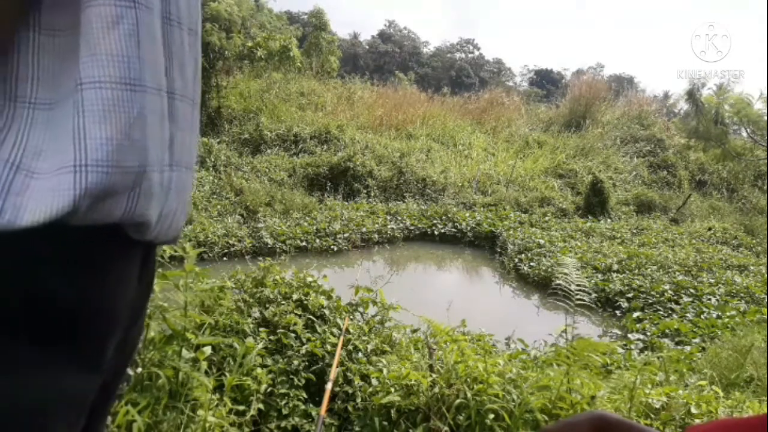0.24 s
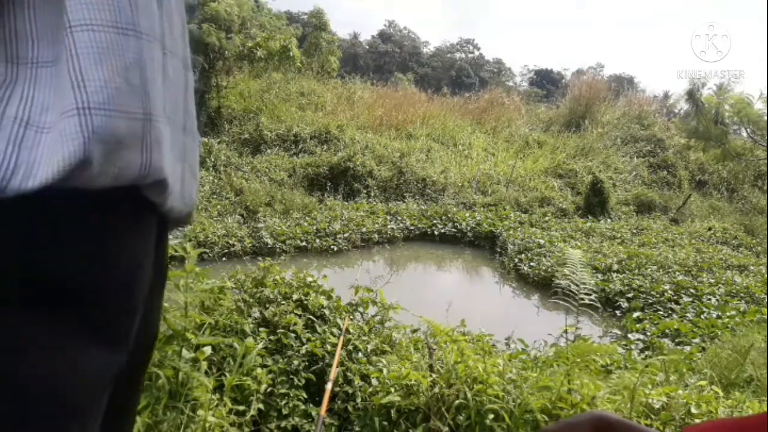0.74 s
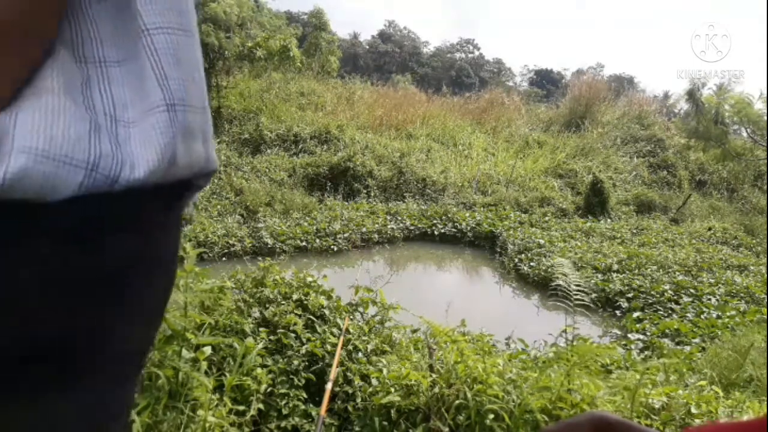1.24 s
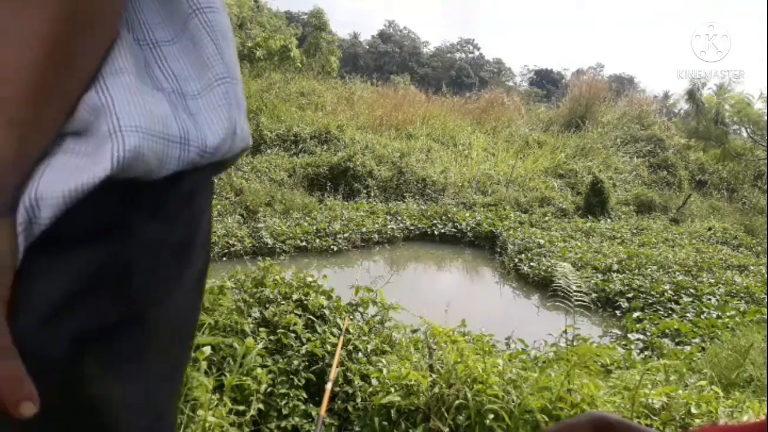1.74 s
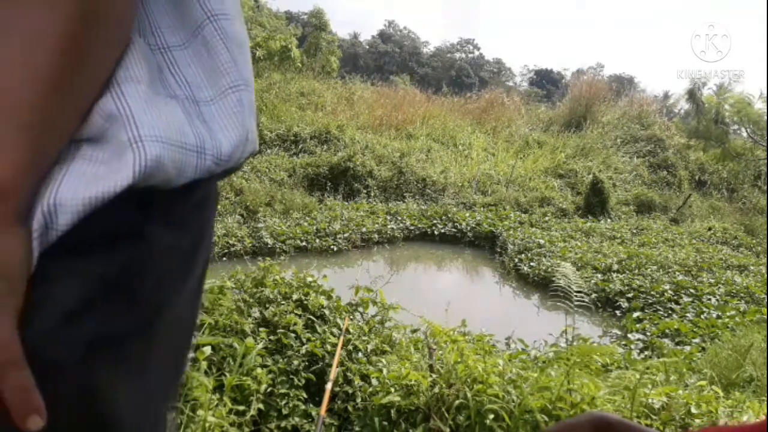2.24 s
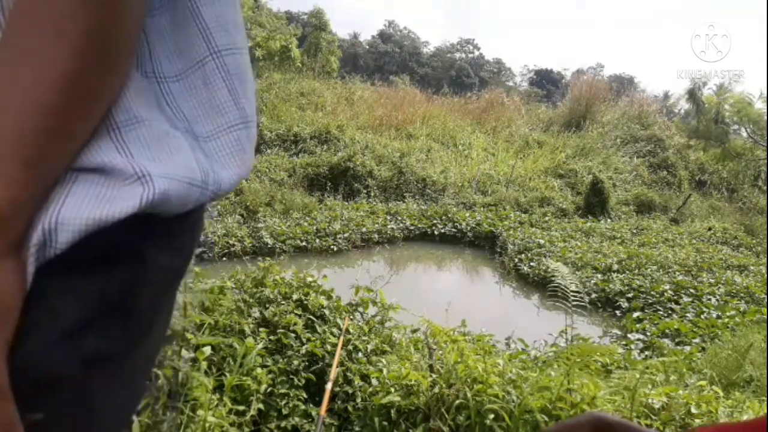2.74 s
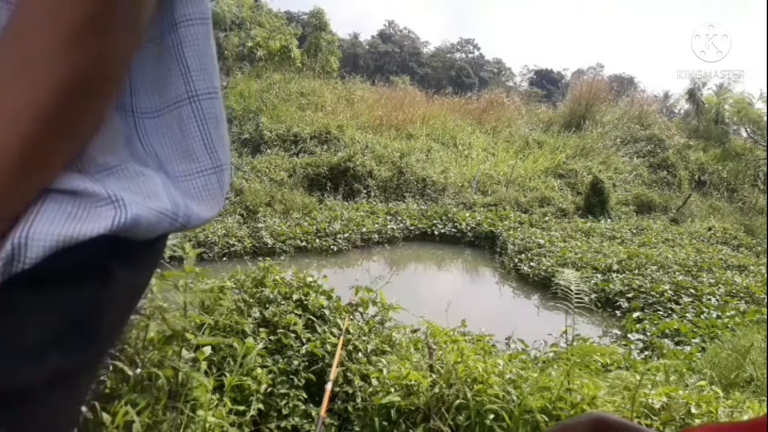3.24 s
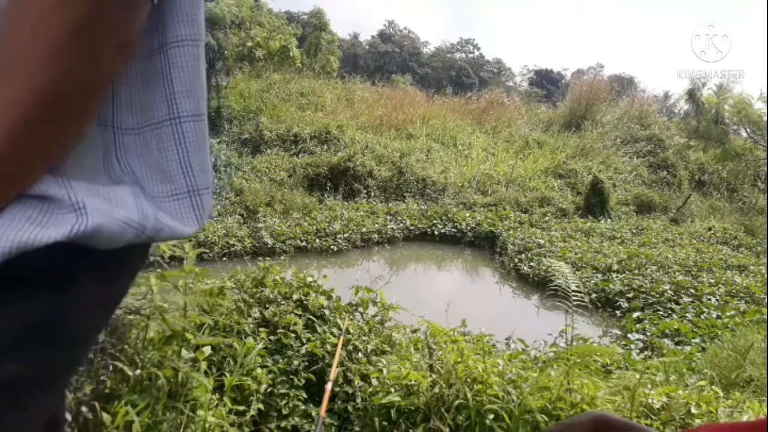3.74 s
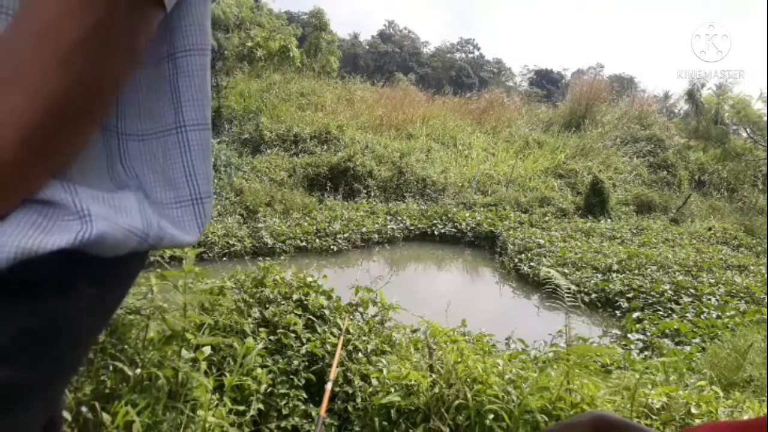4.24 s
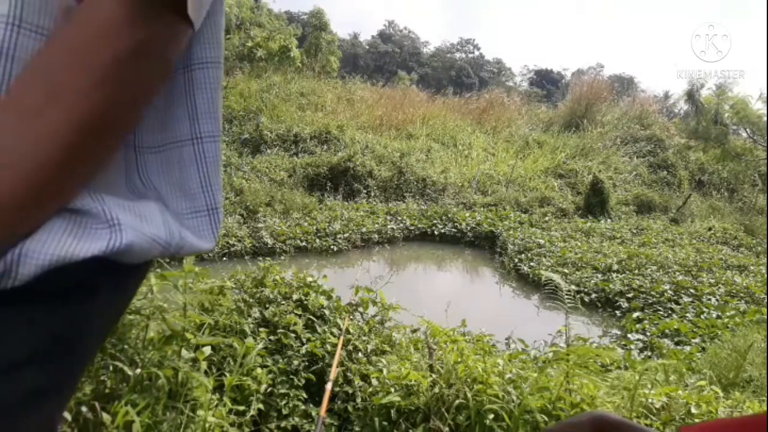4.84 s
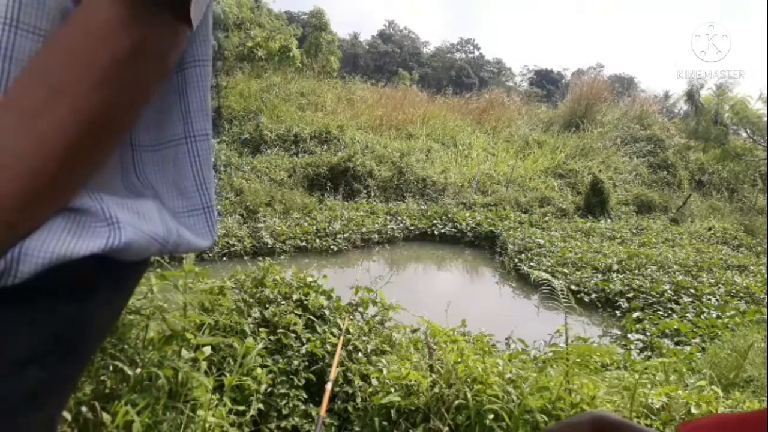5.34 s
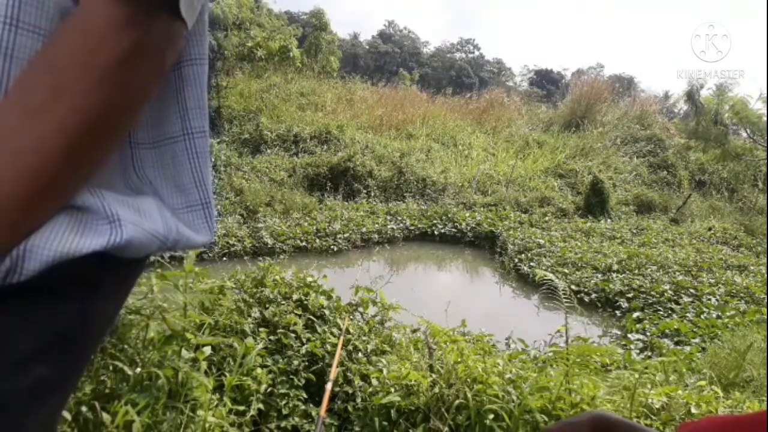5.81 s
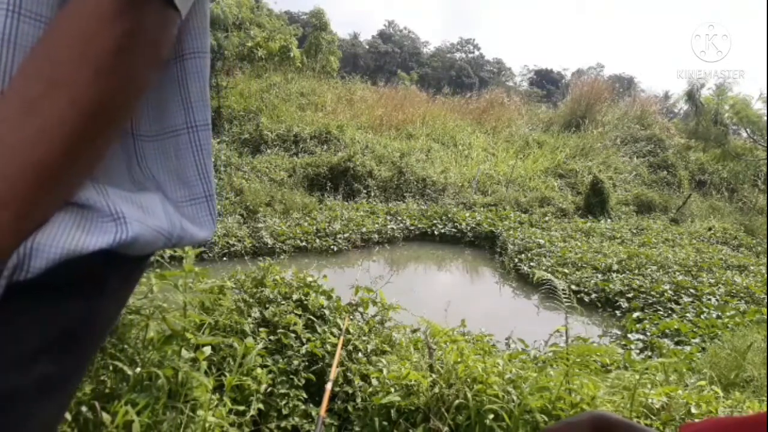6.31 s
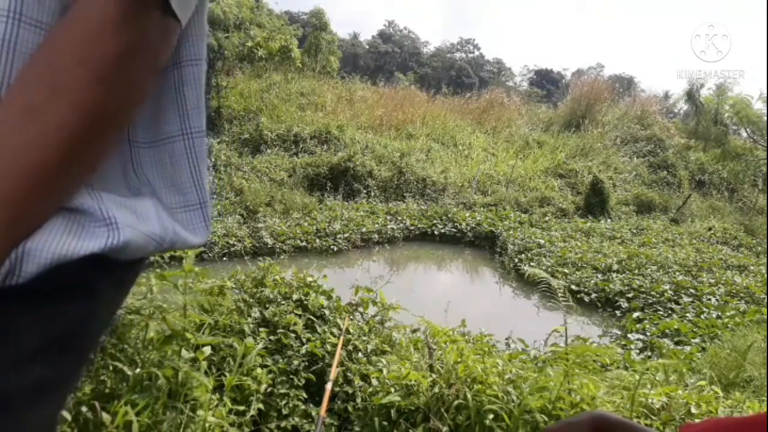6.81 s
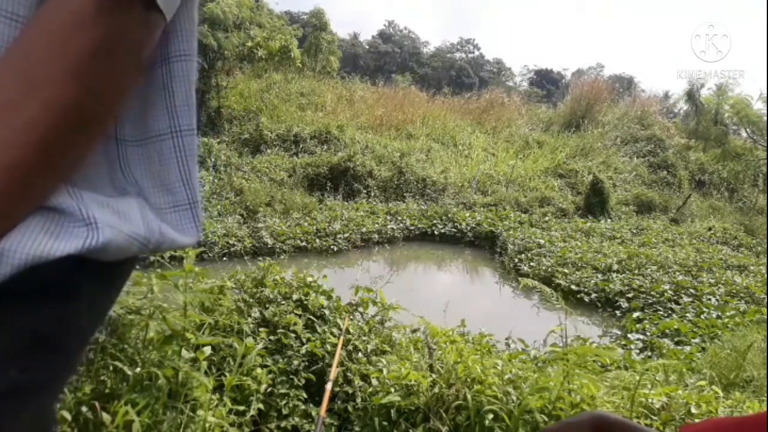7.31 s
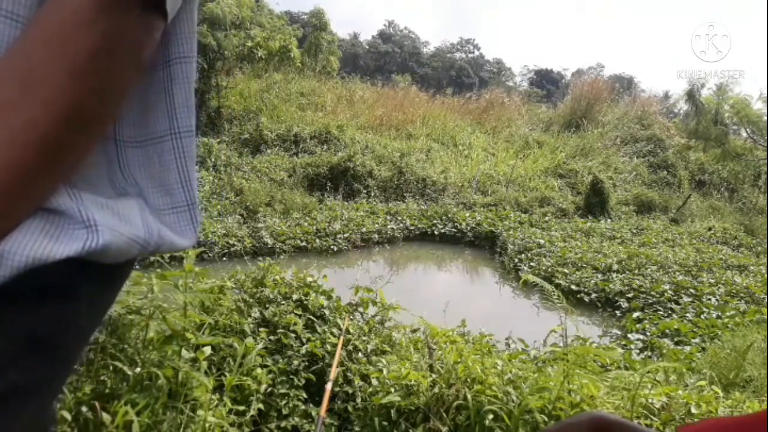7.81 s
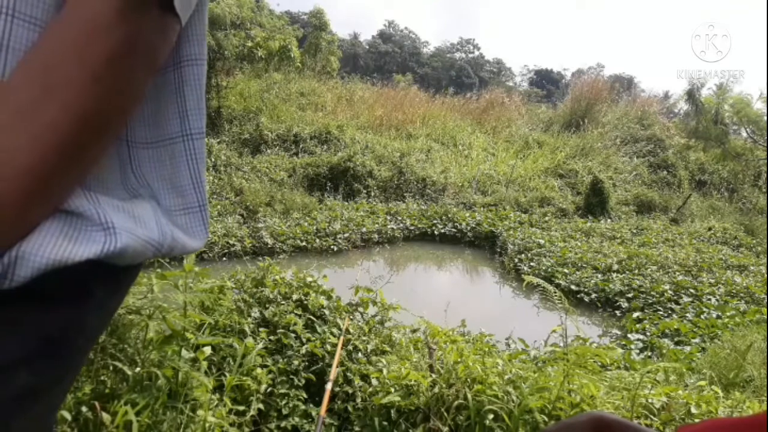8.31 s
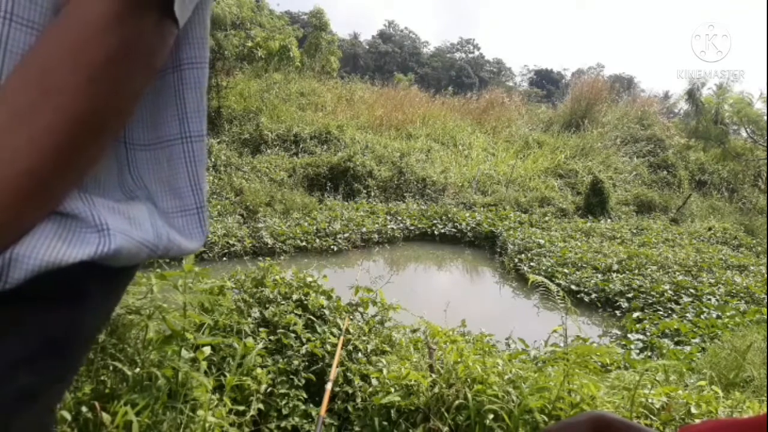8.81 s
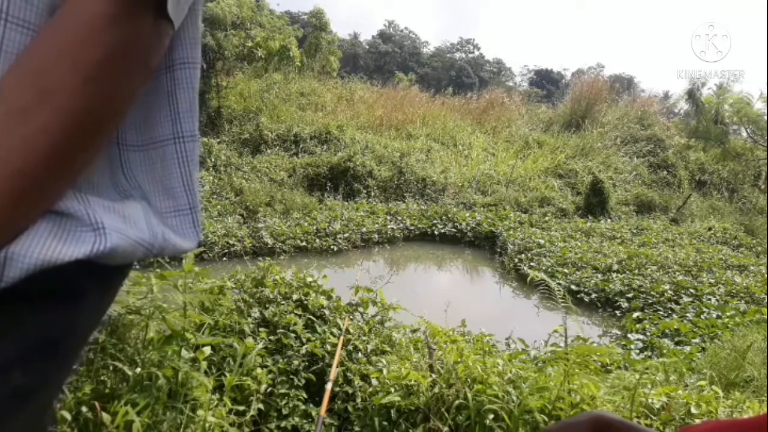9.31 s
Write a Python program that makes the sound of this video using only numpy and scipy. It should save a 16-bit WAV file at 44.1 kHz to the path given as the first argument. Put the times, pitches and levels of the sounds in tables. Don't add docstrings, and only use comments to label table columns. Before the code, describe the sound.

One exposed microphone among bushes picks up dull, irregular wind thumps over a steady, piercing insect drone. Short bird chirps, sliding whistles and flicks come from near and far, with a soft low coo around two seconds. Higher, fainter insect buzzing pulses after three seconds. Leaves rustle softly, dry little snaps sit close by, and a tiny watery plop falls near the end, during another modest gust.

```python
import sys
import numpy as np
from scipy import signal
from scipy.fft import rfft, irfft, next_fast_len
from scipy.io import wavfile
from scipy.ndimage import uniform_filter1d

SR = 44100
rng = np.random.default_rng(int(sys.argv[2]) if len(sys.argv) > 2 else 0)


def ratio_of_db(decibels):
    return 10 ** (np.asarray(decibels, float) / 20)


def transcribe(u):
    v = np.clip(np.atleast_2d(u).T, -1, 1)
    q = np.round(v * 32767).astype(np.int16)
    wavfile.write(sys.argv[1], SR, q)


N = 421596

# t/s, level/dB
STIR = [
    (0, -69.5),
    (1.38, -64),
    (1.7, -68),
    (2.95, -69.5),
    (3.25, -66.5),
    (3.8, -69),
    (5.09, -69.5),
    (6.92, -69),
    (9.02, -70.5),
    (9.56, -70.5),
]


def unit(x):
    return x / np.sqrt(np.mean(x ** 2) + 1e-20)


def curves(rows):
    s, *cols = np.transpose(rows)
    return [np.interp(np.arange(N) / SR, s, c) for c in cols]


def wobble(rate):
    knots = signal.resample_poly(rng.standard_normal(N // 400), 8, 1)
    return np.interp(np.arange(N) * rate * 8 / SR, np.arange(len(knots)), knots)


def filtered(x, response):
    m = next_fast_len(N + SR // 2)
    f = np.fft.rfftfreq(m, 1 / SR) + 1e-3
    return irfft(rfft(x, m) * response(f), m)[:N]


def mode(f, hz, width_hz):
    return 1j * f * width_hz / (hz * hz - f * f + 1j * f * width_hz)


def rush(spectrum, patchy_db):
    z = signal.stft(rng.standard_normal(N), nperseg=512)[2]
    field = uniform_filter1d(rng.standard_normal(z.shape), size=6, axis=0)
    field = uniform_filter1d(field, size=12, axis=1)
    x = signal.istft(z * ratio_of_db(patchy_db * unit(field)), nperseg=512)[1][:N]
    hz, db = np.transpose(spectrum)
    return unit(filtered(x, lambda f: ratio_of_db(np.interp(np.log(f), np.log(hz), db))))


def notes(table, contour, rough, warble_hz, attack):
    out = np.zeros(N + SR)
    flutter = ratio_of_db(rough * (np.clip(wobble(90), -2, .8) + 0.21))
    shake = warble_hz * wobble(100)
    first, last = contour
    for s, length, hz, db in table:
        u, at = np.linspace(0, 1, round(length * SR)), round(s * SR)
        bend = hz * (first * (1 - u) * (1 - 2 * u) + 4 * u * (1 - u) + last * u * (2 * u - 1))
        swell = np.sin(np.pi * u ** attack) ** 0.93
        turns = np.cumsum(bend + shake[at:][:len(u)]) / SR
        out[at:][:len(u)] += ratio_of_db(db + 4.0) * swell * np.sin(2 * np.pi * turns)
    return out[:N] * flutter


def eddies(s, size, hz, phase, cycles):
    span = np.arange(-600, 1600)
    u = span / SR * hz[:, None] / cycles
    bell = np.exp(-u ** 2 * np.where(u < 0, 2.2, 1))
    swing = size[:, None] * bell * np.cos(2 * np.pi * u * cycles + phase[:, None])
    at = np.round(s[:, None] * SR).astype(int) + span
    return np.bincount(np.where((at < 0) | (at > N), N, at).ravel(), swing.ravel(), N + 1)[:N]


def wind(count=1300):
    # t/s, level/dB
    draught = [(0, -65.5), (.4, -49.5), (.8, -45.5), (1.1, -56.5), (1.3, -49), (1.6, -62), (2.3, -56),
               (3.0, -53.5), (3.75, -41.5), (4.15, -49.5), (4.6, -55), (5.9, -56.5), (6.5, -39),
               (6.85, -56), (7.95, -49.5), (8.3, -56.5), (8.7, -50), (9.56, -54)]
    # t/s, peak level/dB, f/Hz
    large_eddies = [(3.209, -23, 119), (3.24, -16.5, 110), (3.264, -23, 170), (3.287, -14.5, 175),
                    (3.306, -17, 138), (3.569, -22.5, 102), (3.618, -24, 124), (3.756, -24, 154),
                    (3.776, -16, 119), (3.818, -25.5, 112), (4.147, -23.5, 147), (4.17, -27, 108),
                    (4.199, -19, 186), (5.728, -24, 121), (5.992, -25, 130), (6.014, -28, 132), (6.057, -25, 137),
                    (6.187, -12.5, 143), (6.216, -18, 185), (6.231, -19, 165), (6.465, -18, 150),
                    (6.522, -21, 155), (6.607, -14, 103), (6.627, -24, 173), (6.645, -18, 246),
                    (6.663, -19.5, 116), (6.701, -25.5, 114), (8.707, -22.5, 80.6), (8.751, -22, 105),
                    (8.81, -24, 133),
                    (0.53, -31.5, 95), (2.466, -38.5, 74), (0.781, -32.5, 93), (0.814, -30.5, 102),
             (1.22, -30.5, 95), (1.285, -33.5, 110), (1.359, -34.5, 105), (1.689, -36, 89),
             (1.902, -30.5, 105), (2.747, -36, 81), (3.377, -27.5, 110), (3.878, -32, 121),
             (4.326, -26, 129), (5.313, -36, 108), (5.452, -31.5, 95.5), (5.51, -29, 103),
             (8.638, -31.5, 95), (5.687, -36, 109), (6.381, -27, 115), (6.831, -28, 89.5), (7.017, -25, 95),
             (7.062, -27, 139), (7.168, -25, 92), (7.537, -25.5, 123), (7.582, -33.5, 90),
             (7.879, -28.5, 92.5), (7.948, -25.5, 103), (8.038, -30.5, 95), (8.404, -28, 110),
             (9.142, -39, 87.5),
                    (0.434, -41.0, 90.0), (0.684, -38, 94.0), (0.718, -38, 91.0), (0.74, -36.5, 124.0),
              (0.758, -31, 99.0), (0.914, -39, 94.0), (1.272, -33, 100.0), (1.331, -36, 111.0),
              (1.347, -40, 113.0), (2.062, -39, 92.0), (2.444, -48, 86.0), (2.478, -49, 82.0),
              (2.889, -43, 115.0), (3.167, -35.5, 101.0), (3.188, -36.0, 130.0), (3.223, -28.0, 99.0),
              (3.326, -34.5, 119.0), (3.527, -37.5, 112.0), (3.545, -30.5, 97.0), (3.606, -27.5, 136.0),
              (3.641, -34, 106.0), (3.687, -34.5, 109.0), (3.719, -30, 122.0), (3.919, -34.5, 99.0),
              (4.073, -34, 112.0), (4.112, -35, 90.0), (4.185, -21, 142.0), (4.214, -26, 150.0),
              (4.338, -27.5, 96.0), (4.916, -40.5, 100.0), (5.172, -43, 96.0), (5.291, -37.5, 109.0),
              (5.481, -40, 102.0), (5.546, -42, 106.0), (5.563, -34.5, 118.0), (5.751, -34.0, 92.0),
              (5.857, -40, 107.0), (6.091, -33.0, 104.0), (6.118, -34, 87.0), (6.27, -37, 90.0),
              (6.308, -34, 129.0), (6.325, -37, 96.0), (6.403, -38, 112.0), (6.439, -33, 151.0),
              (6.509, -27.5, 140.0), (6.541, -30, 102.0), (6.68, -26, 131), (6.724, -34.0, 110.0),
              (6.855, -33, 131.0), (7.027, -32.0, 120.0), (7.564, -39.5, 135.0), (7.6, -36, 81.0),
              (7.817, -35.5, 112.0), (7.847, -46, 86.0), (7.91, -44, 90.0), (8.01, -34.5, 95.0),
              (8.166, -39, 112.0), (8.493, -36.5, 98.0), (8.663, -31.5, 101.0), (8.729, -29, 113.0)]
    # f/Hz, level/dB per Hz
    air = [(25, -31), (60, -7), (123, -2), (261, -9.5), (356, -16), (501, -21.5), (1500, -39.5),
           (1950, -41.5), (3300, -120)]

    s, db, hz = np.transpose(np.array(large_eddies))
    push_or_pull = np.pi * rng.integers(2, size=len(s)) + rng.normal(0, .5, len(s))
    large = eddies(s - .001, ratio_of_db(db + 3.0), hz, push_or_pull, cycles=0.58)

    wake_db = -42 + 0.73 * (db + 28.5)
    rise_s, fall_s = 0.015, 0.017
    marks = np.bincount((s * SR).astype(int), ratio_of_db(2 * wake_db) * SR, N)
    wake = filtered(marks, lambda f: fall_s / (1 + 2j * np.pi * f * fall_s)
                    + rise_s / (1 - 2j * np.pi * f * rise_s))
    steady_db, = curves(draught)
    gust_db = 10 * np.log10(abs(wake) + ratio_of_db(2 * (steady_db + 0.9)))

    draw = rng.random((count, 4))
    s = draw[:, 0] * N / SR
    db = gust_db[(s * SR).astype(int)]
    hz = 85 * 2 ** ((db + 38.5) / 35 + 0.65 * (draw[:, 3] - .5))
    size = ratio_of_db(1.12 * (db + 47.0) - 43.5 + 8.1 * draw[:, 1] ** 2)
    small = eddies(s, size, hz, 2 * np.pi * draw[:, 2], cycles=0.53)

    low_cut = lambda f: (1j * f / (50 + 1j * f)) ** 3
    rumble_db = -58 + 0.23 * (uniform_filter1d(gust_db, size=SR // 10) + 59)
    rumble = ratio_of_db(rumble_db + 0.8 * wobble(4.3)) * rush(air, patchy_db=2.5)
    return filtered(small + large, low_cut) + rumble


def crickets():
    # t/s, level/dB, centre f/Hz
    chorus = [(0.0, -57, 4900), (0.6, -53, 4770), (1.01, -55.5, 4800), (1.28, -50, 4790), (1.84, -55, 4830),
              (2.08, -55.5, 4860), (3.0, -57.5, 4890), (3.15, -53.5, 4890), (3.83, -57.5, 4855),
              (4.85, -53.5, 4870), (6.84, -56.5, 4870), (7.72, -54, 4950), (7.87, -56, 4930),
              (9.56, -53, 4820)]
    # wing f/Hz, level/dB
    singers = [(4685, -7.5), (4762, 0), (4801, -2.8), (4838, -2), (4878, -5.5), (4912, -3), (4947, -4),
               (5001, -4.5), (5065, -11)]

    level_db, centre_hz = curves(chorus)
    near = np.zeros(N)
    for hz, db in singers:
        pitch = hz + 12 * wobble(3.5) + 7 * wobble(12)
        stroke = np.cumsum(49.7 + rng.normal(0, 2.5) + .5 * wobble(2.544)) / SR + rng.random()
        gate = 1 + .45 * np.cos(2 * np.pi * stroke)
        turn_db = (centre_hz - 4860) * (hz - 4860) / 2500
        level = ratio_of_db(db + turn_db + 3.5 * wobble(2.5) + 3.5 * wobble(7))
        near += level * gate * np.sin(2 * np.pi * np.cumsum(pitch) / SR)
    near /= np.sqrt(abs(uniform_filter1d(near ** 2, size=SR // 2)))
    blur = lambda f: mode(f, 4723, 280) * mode(f, 4973, 200) * mode(f, 4720, 700)
    far = filtered(rng.standard_normal(N), blur)
    return ratio_of_db(level_db + 0.36 * wobble(9.7)) * (unit(near) + .5 * unit(far))


def bush_crickets():
    # start t/s, end t/s, buzz rate f/Hz, level/dB
    bouts = [
        (3.263, 3.39, 19, -82),
        (3.972, 4.22, 17.6, -80),
        (4.316, 4.52, 21.5, -81),
        (4.606, 4.68, 19.5, -80),
        (4.763, 5.2, 19.26, -79.5),
        (5.23, 5.82, 19.2, -75.5),
        (6.315, 6.62, 17.7, -82.5),
        (7.092, 7.17, 19, -85),
        (7.246, 7.495, 17.6, -77),
        (7.86, 8.21, 18.1, -81),
    ]
    # start t/s, end t/s, level/dB
    answers = [
        (1.2, 1.4, -93),
        (3.2, 3.5, -96),
        (3.9, 5.35, -91),
        (5.45, 5.99, -89),
        (6.35, 6.723, -91),
        (7.2, 7.62, -89),
        (7.72, 8.28, -89),
    ]

    t, near = np.arange(N) / SR, np.zeros(N)
    shake = np.cumsum(95 * wobble(200)) / SR
    for start, end, rate, db in bouts:
        beat = np.clip(.25 + np.cos(2 * np.pi * rate * (t - start)), 0, 1)
        swell = np.clip((t - start + 0.06) * 12, 0, 1) * (t > start - .02) * (t < end)
        wing_hz = 7910 + 22 * (db + 83.5)
        near += ratio_of_db(db + 3.5) * beat * swell * np.sin(2 * np.pi * (wing_hz * t + shake))
    far = np.zeros(N)
    for start, end, db in answers:
        far += ratio_of_db(db) * np.clip(np.minimum((t - start) * 8, (end - t) * 30), 0, 1)
    buzz = unit(filtered(rng.standard_normal(N), lambda f: mode(f, 8860, 150) ** 2))
    return near * ratio_of_db(2.0 * wobble(60)) + far * ratio_of_db(1.5 * wobble(16)) * buzz


def birds():
    # t/s, hook f/Hz, hook level/dB, tail/s, tail level/dB
    cheeps = [
        (1.319, 4700, -50.5, 0.028, -62),
        (3.668, 5160, -50.5, 0.047, -59.5),
        (3.755, 4700, -54, 0.045, -57),
        (5.846, 4800, -51.5, 0.045, -60),
        (5.927, 4750, -54, 0.045, -58.5),
    ]
    # t/s, length/s, middle f/Hz, level/dB. Short rising flicks, near
    flicks = [(1.226, 0.012, 6600, -65), (1.447, 0.031, 6950, -58.5), (2.525, 0.0212, 5800, -65),
              (2.598, 0.022, 4750, -46.5), (1.24, 0.014, 5500, -53.5), (8.862, .02, 5700, -66),
              (7.452, .02, 7000, -67), (9.095, .022, 6700, -66.5), (4.332, 0.099, 4450, -59)]
    whistles = [
        (.5, 0.11, 1560, -76),
        (0.99, 0.052, 4380, -63),
        (2.395, 0.12, 5170, -60),
        (.2, .05, 1720, -76),
        (7.47, .05, 6630, -63),
        (6.11, 0.045, 1607, -66.5),
        (6.585, .085, 1690, -71.5),
    ]
    slides = [
        (2.03, .1, 4390, -55.5),
        (2.615, 0.058, 4380, -55),
    ]
    chirps = [(.17, .053, 4070, -59), (.48, 0.029, 4070, -63), (.605, 0.04, 3550, -60),
              (.72, 0.05, 4150, -58), (.76, .05, 3400, -72), (1.35, .035, 3300, -63),
              (2.35, .035, 3900, -65), (8.36, .05, 3200, -68), (8.675, .02, 3800, -69),
              (9.3, .04, 4100, -63), (9.44, .06, 3300, -72), (5.55, .05, 4350, -67),
              (5.995, .025, 3000, -66), (1.07, .04, 3700, -61), (1.13, .045, 3450, -65),
              (1.615, 0.0545, 4190, -62), (2.18, .033, 3750, -61), (2.68, 0.026, 3870, -59),
              (3.115, 0.033, 3960, -58), (3.355, .055, 3520, -61), (3.54, .032, 3770, -59),
              (4.78, 0.024, 4000, -61), (7.43, 0.026, 3960, -61), (8.35, .014, 6840, -71),
              (4.26, .05, 3750, -66), (4.34, .04, 3480, -67), (.2, .06, 3770, -72), (1.38, .05, 4100, -79),
              (1.9, .05, 3900, -66), (6.24, .05, 4300, -64), (3.945, .045, 3550, -65.5),
              (6.6, .03, 4000, -66), (1.26, 0.041, 3670, -71)]
    peeps = [(.67, 0.13, 4550, -54.5), (1.45, 0.058, 3330, -66), (1.55, 0.057, 3900, -64),
             (8.46, 0.11, 4200, -66), (9.17, .12, 3460, -78), (6.4, .03, 3600, -71), (3.9, .02, 3700, -66),
             (4.25, 0.012, 4540, -48.5), (4.44, 0.05, 4250, -61), (4.28, 0.019, 2160, -66),
             (5.2, .18, 3780, -71), (5.71, 0.026, 4180, -57.5), (5.96, 0.038, 4060, -58),
             (6.05, 0.076, 2533, -67.5), (6.29, 0.062, 2520, -68.5), (6.29, 0.039, 2050, -72),
             (6.34, 0.047, 1613, -74), (6.52, 0.08, 2480, -69.5), (6.76, .02, 2600, -60),
             (6.785, 0.046, 2550, -64), (6.86, 0.088, 2890, -69), (6.92, .1, 2900, -73),
             (6.8, 0.062, 1674, -75), (5.89, .04, 1590, -73), (6.995, 0.022, 2570, -64),
             (7.03, .025, 2550, -63), (7.46, .07, 3280, -68), (9.015, 0.019, 3600, -71)]

    hooks = [(s, 0.0263, hz, db) for s, hz, db, _, _ in cheeps]
    tails = [(s + .022, length, 3550, db) for s, _, _, length, db in cheeps]
    sing = lambda table, contour: notes(table, contour, rough=4.2, warble_hz=95, attack=0.59)
    close = sing(hooks, (0.82, .9)) + sing(flicks, (.85, 0.95))
    close += notes(tails, (1.19, 0.793), rough=2.5, warble_hz=80, attack=0.42)
    close += notes(whistles, (1.015, 0.97), rough=1.7, warble_hz=21.9, attack=0.59)
    close += notes(slides, (1.1, 0.93), rough=1.9, warble_hz=30, attack=0.43)
    distant = sing(chirps, (1.12, .93))
    distant += notes(peeps, (1.005, 0.96), rough=5.1, warble_hz=60, attack=0.65)
    return close, distant


def ticks():
    # t/s, peak level/dB, dull part level/dB
    snaps = [(.482, -52, 0), (1.905, -60, 4), (1.2365, -55, 4), (1.2604, -44.5, 1), (1.551, -56, 5),
             (8.433, -56, -10), (2.1949, -58, -13), (2.3795, -50.5, 2), (2.9132, -49.5, -4),
             (3.619, -58, 6), (5.69, -48, -12), (7.2094, -62, -8), (7.7443, -53, -16), (8.1903, -51.5, 1),
             (8.3536, -51, -12), (8.6486, -52, -12), (9.0232, -56, 3)]
    bright, dull, t = np.zeros(N + SR), np.zeros(N + SR), np.arange(900) / SR
    for s, db, low_db in snaps:
        snap = ratio_of_db(-60 * t / 0.019) * rng.standard_normal((2, len(t)))
        at = round(s * SR)
        bright[at:][:len(t)] += ratio_of_db(db + 2.5) * snap[0]
        dull[at:][:len(t)] += ratio_of_db(db + low_db + 8.5) * snap[1]
    bright = filtered(bright[:N], lambda f: mode(f, 6800, 3000) ** 3)
    return bright + filtered(dull[:N], lambda f: mode(f, 3600, 2000) ** 2)


def plop():
    # t/s, length/s, middle f/Hz, level/dB
    drop = [
        (8.645, 0.021, 980, -62.5),
    ]
    return notes(drop, (1.04, 0.75), rough=.3, warble_hz=4, attack=0.68)


def dove():
    # t/s, length/s, middle f/Hz, level/dB
    coos = [
        (1.65, 0.22, 232, -62.5),
        (2.07, 0.47, 277, -61),
    ]
    return notes(coos, (1, .995), rough=0.44, warble_hz=0.68, attack=0.55)


def chatter(count=300):
    draw = rng.random((count, 3))
    s = draw[:, 0] * (N / SR - .1)
    db = curves(STIR)[0][(s * SR).astype(int)] - 14 + 5 * draw[:, 2]
    table = np.c_[s, .05 + 0 * s, 3250 + 1200 * draw[:, 1], db]
    return notes(table, (1.075, .9), rough=1.9, warble_hz=80, attack=0.11)


def foliage():
    # f/Hz, level/dB per Hz
    rustle = [(530, -57.5), (900, -16.5), (1760, -15.5), (3450, -11), (4400, -3), (4550, -1), (5920, -37),
              (10000, -120)]
    hiss = [(3090, -32), (5250, -6), (5450, -9), (5880, -7), (6360, -12.5), (7870, -17), (9320, -28.5),
            (10000, -35), (13000, -60), (22000, -120)]
    insects = [(6000, -68), (9500, -17), (12600, -8), (14500, -2), (15350, 2.5), (15600, -14)]
    # t/s, level/dB
    swarm = [
        (0, -73),
        (1.38, -73.5),
        (1.7, -75.5),
        (3.8, -73),
        (5.09, -73.5),
        (5.75, -74.5),
        (6.92, -74.5),
        (8.25, -72.5),
        (9.02, -76),
        (9.56, -74.5),
    ]
    (stir_db,), (far_db,) = curves(STIR), curves(swarm)
    low = ratio_of_db(stir_db + 2.0) * rush(rustle, patchy_db=2.5)
    high = ratio_of_db(-70 + 0.8 * (stir_db + 69)) * rush(hiss, patchy_db=1.5)
    return low + high + ratio_of_db(far_db + 1.4 * wobble(9)) * rush(insects, patchy_db=1.0)


def bushes(x, t60):
    t = np.arange(SR // 3) / SR
    tail = rng.standard_normal(len(t)) * ratio_of_db(-60 * t / t60) * (t > .006)
    return signal.fftconvolve(x, tail / np.linalg.norm(tail))[:N]


def scene():
    calls, distant = birds()
    calls = calls + ratio_of_db(-8.5) * np.roll(calls, round(0.012 * SR))
    near, wings = ticks(), bush_crickets()
    sent = ratio_of_db(-7) * calls + ratio_of_db(-5) * distant + ratio_of_db(-3) * near + ratio_of_db(-3.5) * wings + chatter()
    echoes = bushes(sent, t60=0.2)
    mix = calls + ratio_of_db(-5.5) * distant + near + wings + echoes
    mix = mix + dove() + plop() + wind() + crickets() + foliage()
    return mix[None]


def low_pass(x):
    return signal.sosfilt(signal.butter(12, 16380, fs=SR, output="sos"), x)


def record(dry):
    mix = filtered(dry[0], lambda f: f < 15500)[None]
    return low_pass(mix)


dry = scene()
out = record(dry)
transcribe(out)
```